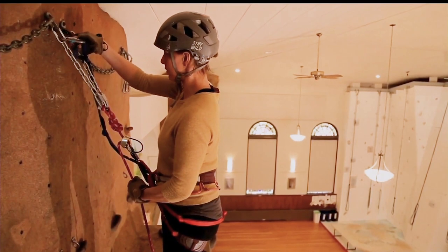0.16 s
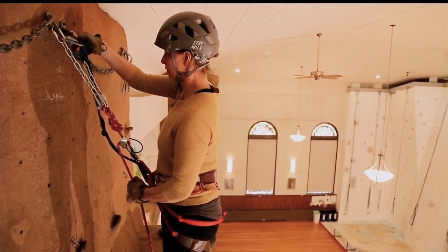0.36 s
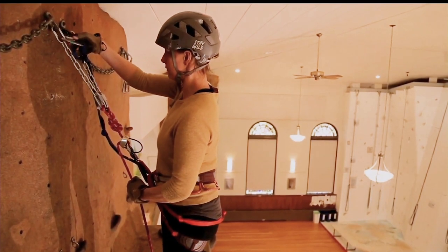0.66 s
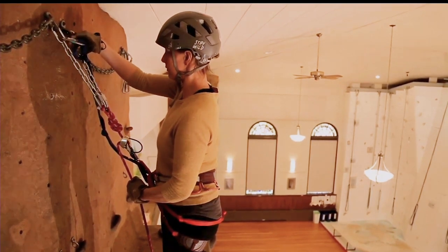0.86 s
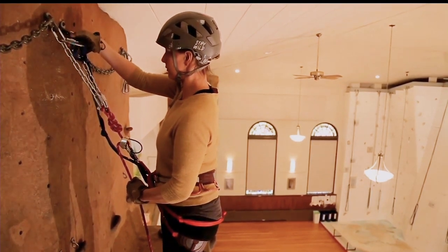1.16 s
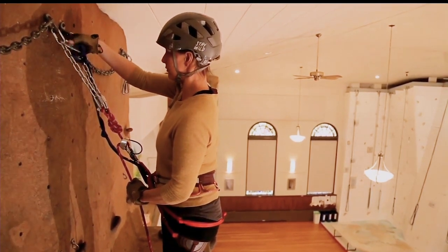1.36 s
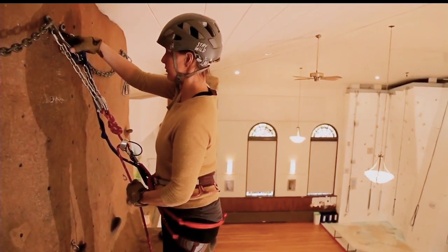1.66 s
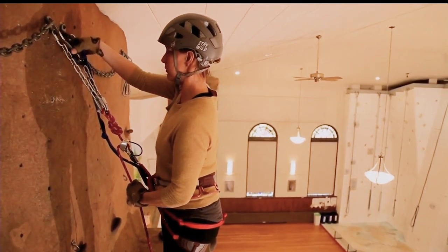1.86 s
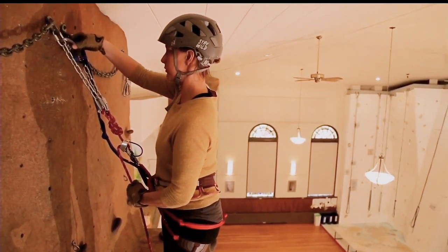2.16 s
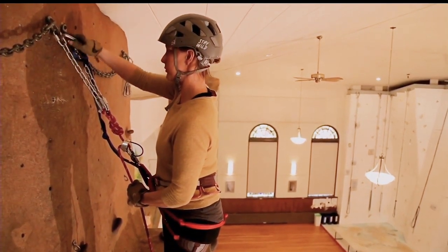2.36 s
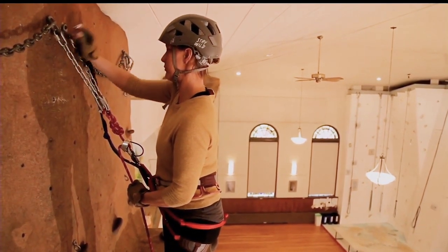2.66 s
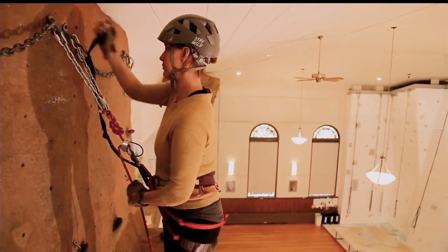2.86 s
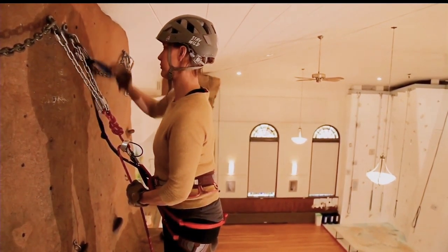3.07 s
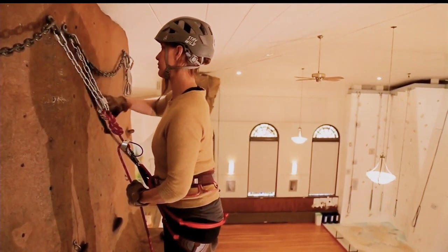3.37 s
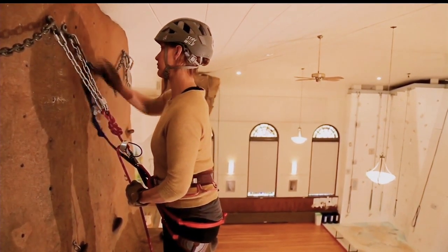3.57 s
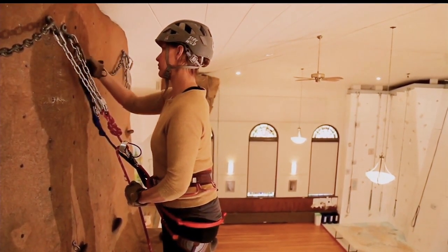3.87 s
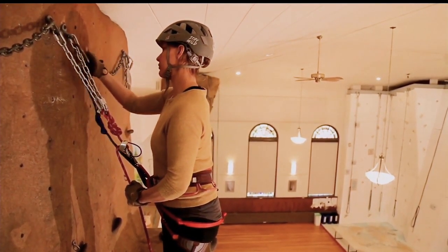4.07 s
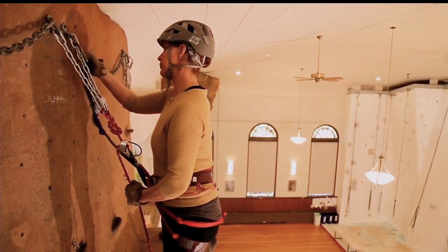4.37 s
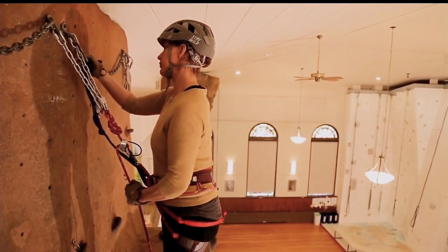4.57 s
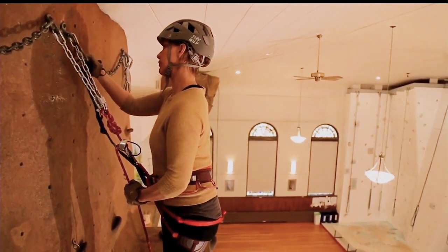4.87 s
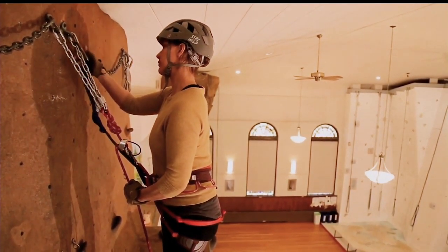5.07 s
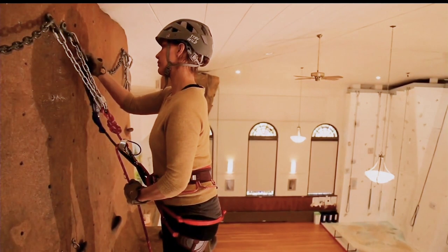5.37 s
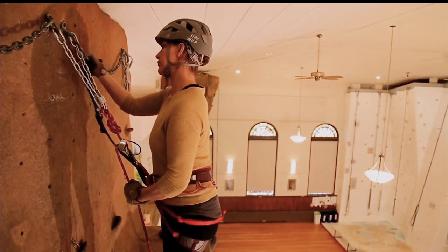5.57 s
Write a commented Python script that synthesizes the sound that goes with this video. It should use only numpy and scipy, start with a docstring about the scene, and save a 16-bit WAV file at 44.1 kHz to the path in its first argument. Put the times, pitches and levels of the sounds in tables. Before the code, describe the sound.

Close, light metallic clacks of climbing hardware, a faint lingering ring, then chain knocks and small scrapes against a hollow panel in an echoing gym.

```python
"""Carabiners clink at the steel anchor of a big indoor climbing gym: noisy contacts drive metal modes.
The chain knocks on the hollow wall panel, with some soft link clinks; links grind, squeak and scrape.
A glove bumps the panel, which rumbles on as filtered noise; one free piece rings as a decaying sine.
The hall reverberates over a faint hum and air noise; the mono microphone adds a comb-like colour."""
import sys
import numpy as np
from scipy import signal
from scipy.fft import rfft, irfft, next_fast_len
from scipy.io import wavfile
from scipy.ndimage import map_coordinates

SR = 44100
rng = np.random.default_rng(int(sys.argv[2]) if len(sys.argv) > 2 else 0)


def store_pcm(level_fs):
    """Save levels as 16-bit WAV."""
    pcm = np.round(np.clip(level_fs, -1, 1) * 32767).astype(np.int16)
    wavfile.write(sys.argv[1], SR, np.atleast_2d(pcm).T)


N = 251811

# carabiner contacts, metal on metal: start_s, clack_pitch_hz, clack_db, hardness_db, chatter_re_touch_db
CLINKS = [(0.079, 1883, -45.5, 1.5, -5), (0.175, 1840, -35.5, -15, 2), (0.198, 1705, -36, -7.5, 0.5),
          (0.34, 1720, -44.5, -6.5, -4), (0.388, 1762, -42, -2, -6), (0.451, 1708, -31.5, -11, 2),
          (0.471, 1800, -34.5, 3.5, 2), (0.5477, 1812, -34, -1, -9), (0.723, 1770, -51.5, 15, 0),
          (0.7816, 1754, -31.5, -1, -7.5), (0.893, 1690, -45, -24, 7), (1.074, 1749, -30, 4.5, -4.5),
          (1.309, 1852, -35.5, 0, -4), (1.411, 1634, -45, 5, 2), (1.492, 1844, -38.5, 17.5, 0),
          (1.499, 1657, -32.5, 14, -12), (1.526, 1663, -36, 11, -7), (1.836, 1690, -44.5, -31, 2),
          (2.045, 1728, -40.5, -4.5, 0.5), (2.066, 1627, -38, 1, -1.5), (2.241, 1814, -36, 0.5, -4),
          (2.3566, 1733, -34, 4.5, -1.5), (2.417, 1497, -33, -1.5, 7), (2.471, 1754, -39.5, -3, 8),
          (2.592, 1755, -43.5, 11.5, -4), (2.926, 2045, -45, 29.5, -11), (4.128, 1520, -61, 28.5, -4),
          (4.462, 1600, -51.5, 18.5, -6), (4.716, 1670, -60.5, 17.5, 9), (4.799, 1910, -62, 23.5, -0.5),
          (5.139, 1760, -56, 22.5, -9), (5.498, 1980, -63.5, 22, -4)]
# chain knocks on the wall, and some soft link clinks:
# start_s, clack_pitch_hz, clack_db, hardness_db, chatter_re_touch_db
KNOCKS = [(2.451, 1750, -41.5, -13, -5), (2.502, 1430, -37, 3.5, 5), (2.621, 1460, -42, -9, -6),
          (3.1684, 1640, -29, 2.5, -3), (3.1876, 1808, -33.5, 5, -2.5), (3.195, 1553, -34, -3, 14),
          (3.49, 1673, -43.5, 2.5, -0.5), (3.5035, 1540, -39, -2.5, 0), (3.533, 1497, -42, -5.5, 4),
          (3.804, 1780, -33, -2, -0.5), (3.865, 1506, -43, -2, 4), (3.932, 1633, -34, -1, -1),
          (3.954, 1500, -39.5, -9, -8), (3.9732, 1693, -33.5, -8, -3), (4.0165, 1720, -30, 2, 5.5),
          (4.026, 1508, -31.5, -9, 3), (4.2364, 1768, -38, 2, 11), (4.657, 1715, -39.5, -28, 0),
          (4.832, 1645, -44, -14, 8), (4.884, 1420, -44.5, -13, 4), (4.899, 1627, -37.5, 3.5, -2),
          (4.959, 1526, -46, -3, -2), (5.0, 1755, -41, -8.5, 12), (5.026, 1560, -36.5, -0.5, 3),
          (5.055, 1390, -48, 0, 3), (5.168, 1606, -39.5, -15, 2), (5.214, 1524, -50, -12, 4),
          (5.252, 1700, -36, 1, 2.5), (5.298, 1680, -43, -6, 17), (5.339, 1550, -44.5, 0, 7),
          (5.3625, 1528, -41, -16, 4), (5.607, 1900, -42.5, -2.5, 23), (5.704, 1750, -44.5, 2, 0)]
# bands of a contact (thud, clack, edge, tick): low_hz, high_hz
CONTACT_BANDS = [(250, 900), (1100, 2200), (2400, 4600), (5400, 11000)]
# colour of a contact, before its pitch shift: freq_hz, relative_db
BODY_COLOUR = [(200, -25), (290, -39), (400, -15.5), (650, -9), (900, -20), (1200, -7.5), (1720, -4.5),
               (2280, -7.5), (2830, -10), (3600, -10.5), (4400, -14.5), (6000, -13.5), (10000, -16),
               (14000, -29)]
# low and high roll-off of each contact: freq_hz, gain_db
CONTACT_ROLLOFF = [(90, -26), (240, -9), (350, 2), (500, 0), (10500, 0), (14000, -10)]
# modes of one link: pitch_ratio, mean_relative_db, t60_s
LINK_MODES = [(1, -2, 0.13), (1.6, 2, 0.048), (1.882, -9.5, 0.079), (2.45, 0, 0.051), (3.3, -3.5, 0.03),
              (4.2, -6.5, 0.029)]
# ringing of the hardware: freq_hz, mean_relative_db, t60_s
STEEL_MODES = [(1135, -2.5, 0.15), (1395, 1, 0.24), (1514, 0.5, 0.26), (1713, 2.5, 0.08),
               (1943, 4.5, 0.067), (2170, -27, .15), (2540, -15.5, 0.43), (2708, 2, 0.16),
               (3120, -10.5, 0.19), (3296, -10, 0.087), (3340, -4.5, 0.26)]
# swells of grinding noise; the first is a fading hall tail: start_s, length_s, relative_db
GRINDS = [(0.0, 0.1, -40), (0.543, .15, -42), (1.108, .15, -41), (1.511, .21, -36), (2.15, .2, -47.5),
          (3.213, .15, -45.5), (3.937, .06, -43), (4.641, .2, -54.5), (5.152, .08, -46), (5.656, .05, -49)]
# spectrum of the grinding noise: freq_hz, relative_db
GRIND_COLOUR = [(500, -24.5), (1000, -30.5), (1400, -6.5), (1720, 0), (2150, -10), (2800, -7.5),
                (3400, -14), (4400, -21.5), (6000, -47), (14000, -39)]
# regular stick-slip squeaks: start_s, length_s, start_hz, end_hz, level_db
SQUEAKS = [(3.86, .03, 6220, 6400, -55), (3.892, .045, 5100, 4780, -42), (4.254, .026, 5020, 4790, -49),
           (4.598, .054, 5050, 4700, -53), (4.915, .055, 4900, 5000, -59), (5.308, .055, 5050, 4900, -49),
           (5.63, .04, 4950, 5000, -58)]
# irregular slips: start_s, length_s, start_hz, end_hz, level_db
SCRAPES = [(0.632, 0.077, 1845, 1740, -51), (0.633, 0.078, 2830, 2598, -46.5),
           (1.891, 0.054, 2910, 2730, -49.5), (2.162, 0.041, 1585, 1590, -48),
           (2.214, 0.02, 2825, 2810, -43.5), (3.15, 0.054, 1690, 1573, -39),
           (5.031, 0.056, 4250, 4050, -51), (5.373, 0.033, 4050, 3980, -54.5)]
# friction hiss under the squeaks: freq_hz, relative_db
HISS_COLOUR = [(3000, -14), (5500, 3), (6800, -12), (7700, 5), (8800, -16), (10000, -6.5), (14000, -23)]
# soft bumps on the wall panel: start_s, relative_db
THUMPS = [(0.797, -48), (1.278, -56), (1.355, -57), (1.507, -43.5), (2.504, -44.5), (2.527, -51.5),
          (2.611, -49), (2.65, -53.5), (3.172, -49), (4.05, -51), (4.786, -57), (5.041, -64), (5.35, -51.5)]
# modes of the panel, before detuning: freq_hz, mean_relative_db, t60_s
PANEL_MODES = [(177, -7, 0.19), (255, -18, 0.069), (308, -6.5, 0.29), (429, 6.5, 0.056), (550, -35, 0.021),
               (627, -13, 0.1)]
# spectrum of the panel rumble: freq_hz, relative_db
PANEL_COLOUR = [(70, -29), (130, -31), (183, 3.5), (240, -25), (330, 3), (480, -4.5), (650, -4),
                (950, -3.5), (2500, -29.5)]
# free piece left ringing: start_s, freq_hz, level_db, t60_s
FREE_PIECE = [(2.418, 2790, -49.5, 2.7)]
# decay of the hall tail: freq_hz, t60_s
HALL_DECAY = [(150, 2.1), (600, 0.71), (1500, 2.34), (3000, 1.58), (6000, 1.26), (12000, 2.08)]
# colour of the hall answer: freq_hz, gain_db
HALL_SEND = [(150, -5.5), (600, 11.5), (1600, -0.5), (3200, 3), (4500, -0.5), (7000, -7.5), (12000, -5)]
# spectrum of the air noise: freq_hz, relative_db
AIR_COLOUR = [(25, -22), (55, -19), (95, -5), (130, 6), (250, 4.5), (600, -21), (1500, -33), (4000, -26),
              (7000, -14.5), (10000, -9.5), (14000, -9)]
# dips of the microphone: centre_hz, gain_db
MIC_DIPS = [(2350, -4), (3720, -6), (5170, -10), (6620, -9), (8150, -6), (9770, -7), (11370, -10),
            (12880, -9)]

# thud, edge, tick re the clack at hardness 0
CLINK_BALANCE_DB, KNOCK_BALANCE_DB = (-46, -1, -20), (-18, -6.5, -20.5)
# share of hardness_db that thud and edge follow; the tick follows it in full
CLINK_SHARES, KNOCK_SHARES = (0.043, 0.15), (0.36, 0.61)
LAG_S, LAG_KNEE_HZ = 0.008, 1349.6
# pitch and hardness are centres; level is re the grinding swell
JOSTLES_PER_S, JOSTLE_HZ, JOSTLE_DB, JOSTLE_HARDNESS_DB, JOSTLE_SPREAD_DB = 14, 1637, -18.5, 10, -2
GRIND_RISE_S, GRIND_T60_S = 0.097, 0.68
SQUEAK_SCATTER, SCRAPE_SCATTER = 0.0062, 0.05  # share of the pitch
# rumble re the event it follows; the rope rub is a steady floor
RUMBLE_CLINK_DB, RUMBLE_KNOCK_DB, RUMBLE_THUMP_DB, ROPE_DB = -36.5, -28.5, -14, -73
RUMBLE_RISE_S, RUMBLE_HOLD_S, RUMBLE_T60_S = 0.018, 0.042, 0.29
TOP_HZ = 14450


def amp(db):
    """Decibels to amplitude gain."""
    return 10 ** (np.asarray(db) / 20)


def unit(x):
    """Scale to rms 1."""
    return x / np.sqrt(np.mean(x ** 2) + 1e-20)


def along(points, hz):
    """Interpolate (freq_hz, value) points on a log frequency axis."""
    f, v = np.transpose(points)
    return np.interp(np.log(hz + 1), np.log(f + 1), v)


def wobble(rate, size):
    """Smooth random curve through normal knots, rate knots per second."""
    knots = rng.standard_normal(int(size * rate / SR) + 4)
    return map_coordinates(knots, [np.arange(size) * rate / SR])


def filtered(x, response):
    """Multiply the spectrum of x by response(hz)."""
    m = 2 * next_fast_len((N + SR) // 2)
    return irfft(rfft(x, m) * response(np.fft.rfftfreq(m, 1 / SR)), m)[:N]


def coloured(x, spectrum):
    """Shape x by a (freq_hz, relative_db) spectrum, at rms 1."""
    return unit(filtered(x, lambda hz: amp(along(spectrum, hz))))


def causal(gain):
    """Minimum-phase response with this gain, by folding the cepstrum."""
    cepstrum = irfft(np.log(gain + 1e-6))
    half = len(cepstrum) // 2
    cepstrum[1:half] *= 2
    cepstrum[half + 1:] = 0
    return np.exp(rfft(cepstrum))


def add(track, start_s, sound):
    """Mix a sound into the track at start_s."""
    start = max(round(start_s * SR), 0)
    part = track[start:start + len(sound)]
    part += sound[:len(part)]


def swells(rows, rise_s, t60_s):
    """Gain of overlapping (start_s, hold_s, db) events that rise, hold and decay, summed in power."""
    t = np.arange(0, N, 32) / SR
    start_s, hold_s, db = np.transpose(rows)[:, :, None]
    decay = amp(db - 60 * np.maximum(t - start_s - hold_s, 0) / t60_s)
    rise = np.exp(np.minimum(t - start_s, 0) / rise_s)
    return np.interp(np.arange(N) / SR, t, np.linalg.norm(decay * rise, axis=0))


def clinks(contacts, balance_db, shares, link_db, ring_db, loose_db, chatter_t60_s,
           body_hz=1680, scatter_db=4):
    """Each contact drives the hardware; its hardness sets the balance of thud, clack, edge and tick."""
    track = np.zeros(N)
    size, contact_s = 16384, 0.02
    t, hz = np.arange(size) / SR, np.fft.rfftfreq(size, 1 / SR)
    centres_hz = np.sqrt(np.prod(CONTACT_BANDS, axis=1))
    mode_hz, mode_db, mode_t60_s = np.transpose(STEEL_MODES)[:, :, None]
    modes = amp(mode_db - 60 * t / mode_t60_s) * np.sin(2 * np.pi * mode_hz * t)
    # slow bending waves bring the low part of a contact late
    delay_s = LAG_S / (1 + (hz / LAG_KNEE_HZ) ** 6)
    lag = np.exp(-2j * np.pi * np.cumsum(delay_s) * SR / size)
    (thud_db, edge_db, tick_db), (thud_share, edge_share) = balance_db, shares
    for start_s, pitch_hz, clack_db, hardness_db, chatter_db in contacts:
        force = contact(t, chatter_db + loose_db, chatter_t60_s)
        # grip and load shift the body's resonance
        body = causal(amp(along(BODY_COLOUR, hz * body_hz / pitch_hz)))
        clack = irfft(rfft(force) * body)
        # every contact lands on a new spot and wakes the modes at new strengths
        strengths = amp(scatter_db * rng.standard_normal(len(STEEL_MODES)))
        ring = (strengths * rng.choice([-1, 1], len(STEEL_MODES))) @ modes
        hit = rfft(unit(clack) + amp(link_db) * link_modes(t, pitch_hz) + amp(ring_db) * unit(ring))
        power = [2 * np.sum(abs(hit[(hz > lo) & (hz < hi)]) ** 2) / (size * contact_s * SR)
                 for lo, hi in CONTACT_BANDS]
        hardness = hardness_db * np.array([thud_share, 0, edge_share, 1])
        band_db = clack_db + np.array([thud_db, 0, edge_db, tick_db]) + hardness
        balance = np.column_stack([centres_hz, band_db - 10 * np.log10(power)])
        shape = causal(amp(along(balance, hz) + along(CONTACT_ROLLOFF, hz)))
        add(track, start_s, irfft(hit * lag * shape)[:size * 3 // 4])
    return track


def contact(t, chatter_db, chatter_t60_s, uneven_db=3.5, dull_hz=5500):
    """Force of one contact: a short noise touch, then loose parts chatter with less treble."""
    delay_s, touch_t60_s = 0.003, 0.008
    touch = rng.standard_normal(len(t)) * amp(-60 * t / touch_t60_s)
    chatter_gain = amp(uneven_db * wobble(451, len(t)) - 60 * t / chatter_t60_s)
    chatter = rng.standard_normal(len(t)) * chatter_gain
    chatter *= np.clip(2 * t / delay_s - 1, 0, 1)
    softer = signal.butter(1, min(dull_hz, SR / 3), fs=SR)
    return unit(touch) + amp(chatter_db) * signal.lfilter(*softer, unit(chatter))


def link_modes(t, pitch_hz, detune=0.0329):
    """The struck link rings briefly at its own pitch and a few inharmonic modes above."""
    ratio, db, t60_s = np.transpose(LINK_MODES)[:, :, None]
    strength, shift = rng.standard_normal((2, len(LINK_MODES), 1))
    hz = pitch_hz * ratio * (1 + detune * np.log2(ratio) * shift)
    modes = amp(db + 2 * strength - 60 * t / t60_s) * np.sin(2 * np.pi * hz * t)
    return unit(np.sum(modes, axis=0))


def jostles(pitch_spread=0.058):
    """Light random contacts of loose links during the swells of GRINDS, at levels that follow them."""
    contacts = []
    for start_s, length_s, db in GRINDS:
        draws = rng.uniform(-0.8, 1, (round(JOSTLES_PER_S * length_s), 4))
        for when, pitch, strength, hardness in draws:
            contacts.append((start_s + length_s * abs(when),
                             JOSTLE_HZ * (1 + pitch_spread * pitch),
                             db + JOSTLE_DB + JOSTLE_SPREAD_DB * strength,
                             JOSTLE_HARDNESS_DB + JOSTLE_SPREAD_DB * hardness, 0))
    return contacts


def grinding(grind_db=-8, grain_db=3):
    """Swells of grinding noise with fast and slow random gain; the first stands for a hall tail."""
    grains = rng.standard_normal(N) * amp(grain_db * wobble(350, N) + 1.4 * wobble(20.85, N))
    return amp(grind_db) * swells(GRINDS, GRIND_RISE_S, GRIND_T60_S) * coloured(grains, GRIND_COLOUR)


def squeaks(slips, scatter):
    """Metal slipping under load sings a short gliding note, or scrapes when its pitch scatters."""
    track = np.zeros(N)
    octave_db, flutter_db, clean_scatter = -14, 4, 0.02
    # regular slipping builds a stronger overtone
    octave = amp(octave_db) * np.exp(-scatter / clean_scatter)
    for start_s, length_s, start_hz, end_hz, db in slips:
        u = np.linspace(0, 1, int(length_s * SR))
        glide_hz = end_hz + (start_hz - end_hz) * (1 - u) ** 2
        phase = 2 * np.pi * np.cumsum(glide_hz * (1 + scatter * wobble(1113, len(u)))) / SR
        swell = np.sqrt(abs(np.sin(np.pi * u))) * amp(flutter_db * wobble(265, len(u)))
        tone = np.sin(phase) + octave * np.sin(2 * phase)
        add(track, start_s, amp(db) * unit(swell * tone))
    return track


def friction(hiss_db=-63, rise_s=0.028, t60_s=0.2):
    """The slipping surfaces hiss in small noise grains around each squeak."""
    grain_db, grains_per_s = 5, 120
    grains = rng.standard_normal(N) * amp(grain_db * wobble(grains_per_s, N))
    rows = [(start_s, length_s, hiss_db) for start_s, length_s, *_ in SQUEAKS]
    return swells(rows, rise_s, t60_s) * coloured(grains, HISS_COLOUR)


def free_ring():
    """A piece let go by the hand rings as a decaying sine, then is stopped at a set time."""
    track, t = np.zeros(N), np.arange(SR) / SR
    stop_s, fade_s = 3.19, 0.03
    for start_s, hz, db, t60_s in FREE_PIECE:
        fade = np.clip((stop_s - start_s - t) / fade_s, 0, 1)
        tone = np.sqrt(2) * np.sin(2 * np.pi * hz * t)
        add(track, start_s, amp(db - 60 * t / t60_s) * fade * tone)
    return track


def thumps(attack_s=0.013):
    """Soft glove bumps wake the low modes of the hollow wall panel."""
    track, t = np.zeros(N), np.arange(SR // 2) / SR
    hz, mode_db, t60_s = np.transpose(PANEL_MODES)[:, :, None]
    spread = 0.018  # share of the mode frequency
    for start_s, db in THUMPS:
        strength, detune = rng.standard_normal((2, len(PANEL_MODES), 1))
        tones = np.sin(2 * np.pi * hz * (1 + spread * detune) * t)
        ring = amp(mode_db + 2 * strength - 60 * t / t60_s) * tones
        add(track, start_s, amp(db) * (1 - np.exp(-t / attack_s)) * ring.sum(0))
    return track


def panel_rumble():
    """The hollow panel rumbles after contacts and bumps, and steadily under the rubbing rope."""
    rubs = rng.standard_normal(N) * amp(1.9 * wobble(45, N))
    shakes = [(s, RUMBLE_HOLD_S, db + RUMBLE_CLINK_DB) for s, _, db, *_ in CLINKS]
    shakes += [(s, RUMBLE_HOLD_S, db + RUMBLE_KNOCK_DB) for s, _, db, *_ in KNOCKS]
    shakes += [(s, RUMBLE_HOLD_S, db + RUMBLE_THUMP_DB) for s, db in THUMPS]
    gain = np.hypot(swells(shakes, RUMBLE_RISE_S, RUMBLE_T60_S), amp(ROPE_DB))
    return gain * coloured(rubs, PANEL_COLOUR)


def hall(x, build_s=0.048, early_db=-17, early_t60_s=0.17, tail_db=-12.5):
    """Near walls answer after 8 ms; the big hall's tail builds up and dies slowly."""
    size = 2 * SR
    t = np.arange(size) / SR
    hz, frames_s, z = signal.stft(rng.standard_normal(size), SR, nperseg=256)
    decay = amp(-60 * frames_s / along(HALL_DECAY, hz)[:, None])
    tail = signal.istft(z * decay, SR, nperseg=256)[1][:size]
    tail *= 1 - np.exp(-(t / build_s) ** 2)
    early = rng.standard_normal(size) * amp(-60 * t / early_t60_s) * (t > 0.008)
    answer = amp(tail_db) * tail / np.linalg.norm(tail)
    answer += amp(early_db) * early / np.linalg.norm(early)
    return filtered(signal.fftconvolve(x, answer)[:N], lambda f: amp(along(HALL_SEND, f)))


def room_tone(air_db=-68, hum_db=-77, hum_hz=120):
    """Ventilation and microphone hiss as coloured noise, mains hum as a wavering sine."""
    tone = np.sin(2 * np.pi * hum_hz * np.arange(N) / SR)
    hum = unit(tone * amp(4.1 * wobble(4.08, N)))
    air = coloured(rng.standard_normal(N), AIR_COLOUR)
    return amp(air_db) * air + amp(hum_db) * hum


def scene(level_db=1):
    """The hardware close by, the hall around it; level_db lifts contacts, grinding, bumps and rumble."""
    carabiners = clinks(CLINKS + jostles(), CLINK_BALANCE_DB, CLINK_SHARES,
                        link_db=-3.5, ring_db=-10.5, loose_db=3, chatter_t60_s=0.099)
    chain = clinks(KNOCKS, KNOCK_BALANCE_DB, KNOCK_SHARES,
                   link_db=-3.5, ring_db=-3.5, loose_db=2.5, chatter_t60_s=0.1)
    slipping = squeaks(SQUEAKS, SQUEAK_SCATTER) + squeaks(SCRAPES, SCRAPE_SCATTER) + friction()
    handling = grinding() + thumps() + panel_rumble()
    near = amp(level_db) * (carabiners + chain + handling) + slipping
    return (near + hall(near) + free_ring() + room_tone())[None]


def record(dry):
    """The microphone has a row of narrow dips and a low cut; nothing is kept above TOP_HZ."""
    low_cut_hz, dip_width_hz = 95, 210

    def response(hz):
        dips_db = sum(db * np.exp(-((hz - centre_hz) / dip_width_hz) ** 2) for centre_hz, db in MIC_DIPS)
        low_cut = hz ** 3 / np.hypot(hz ** 3, low_cut_hz ** 3)
        return causal(amp(dips_db) * low_cut) * (hz < TOP_HZ)

    return filtered(dry[0], response)[None]


dry = scene()
out = record(dry)
store_pcm(out)
```